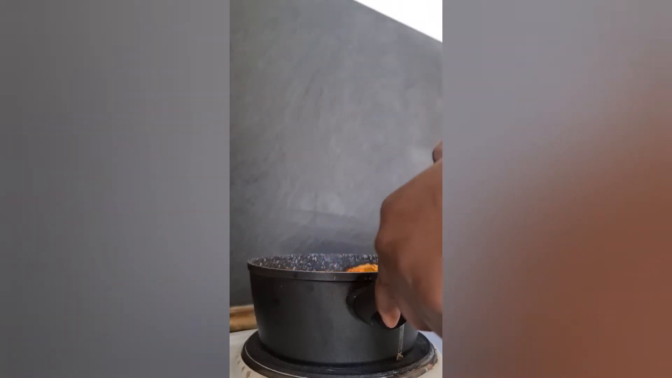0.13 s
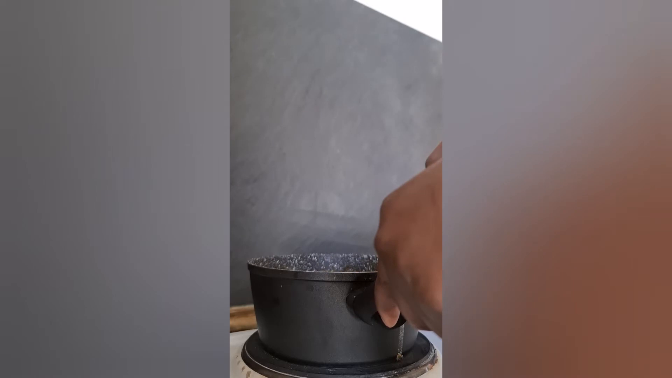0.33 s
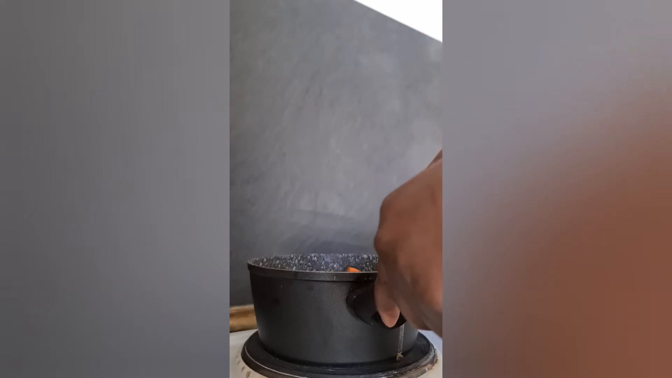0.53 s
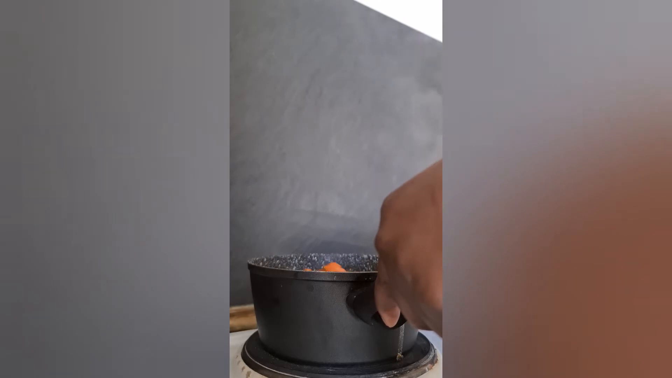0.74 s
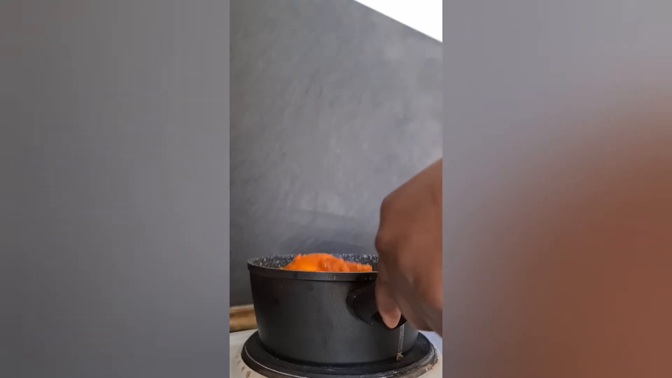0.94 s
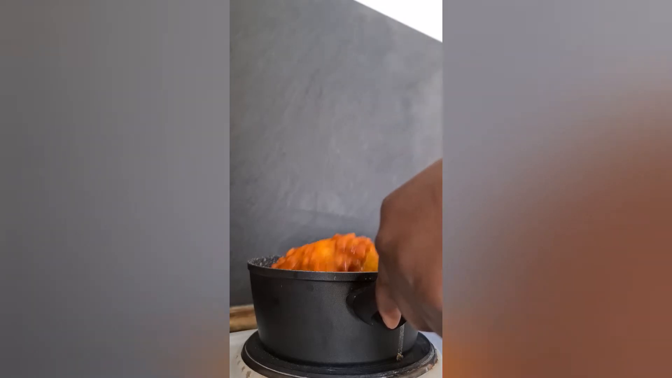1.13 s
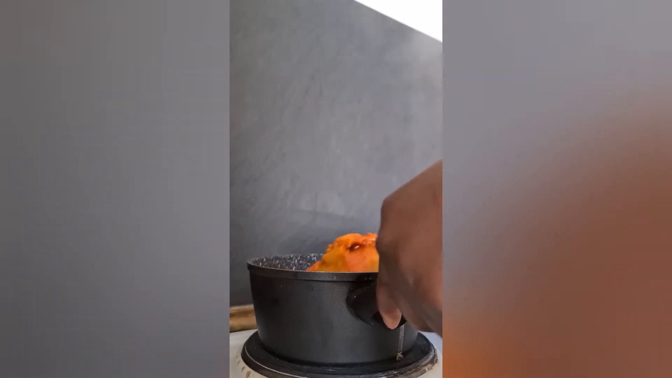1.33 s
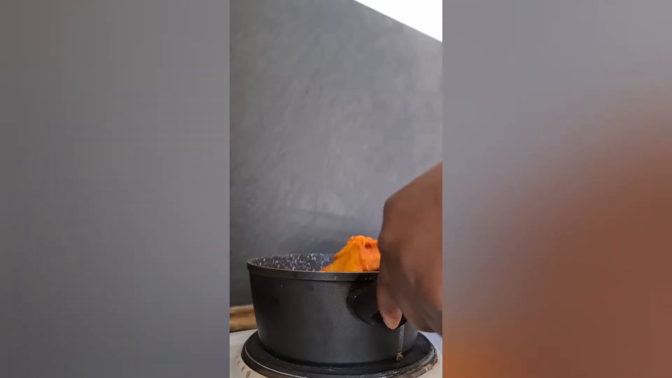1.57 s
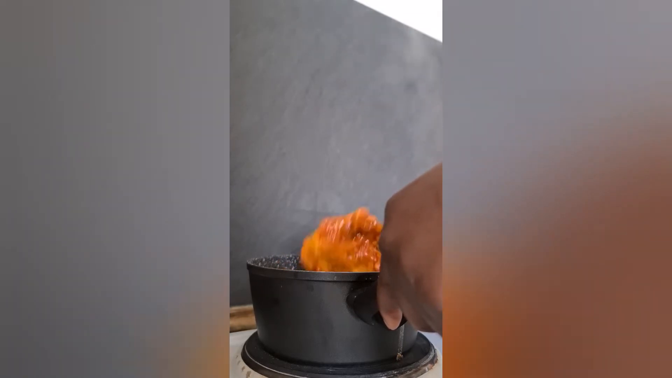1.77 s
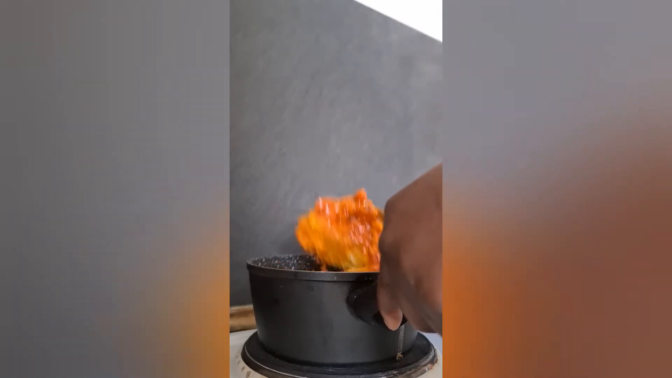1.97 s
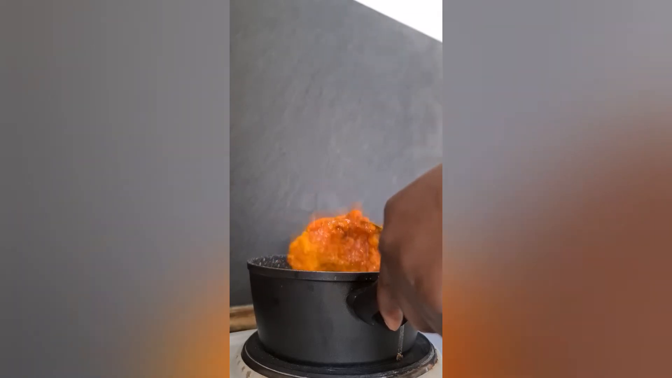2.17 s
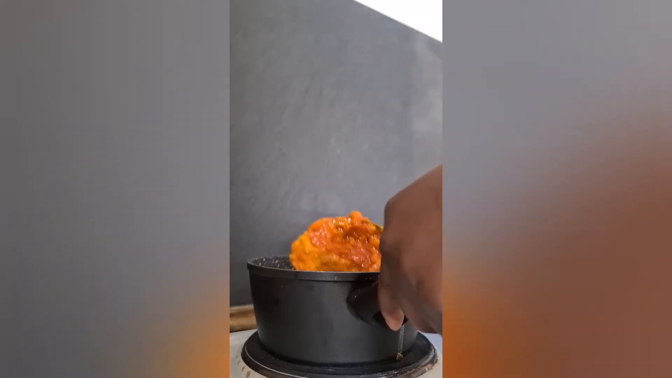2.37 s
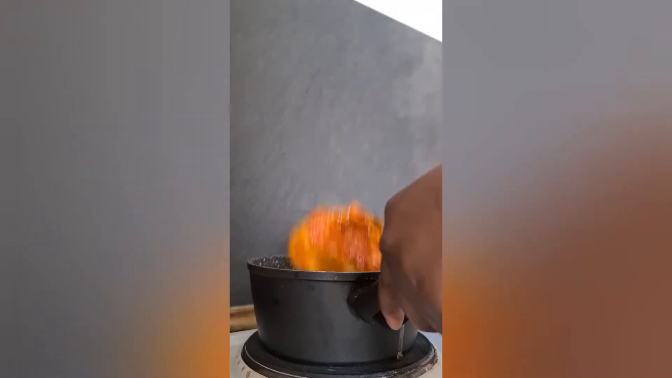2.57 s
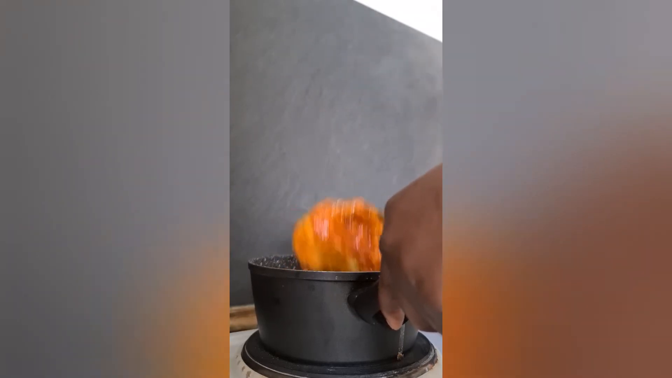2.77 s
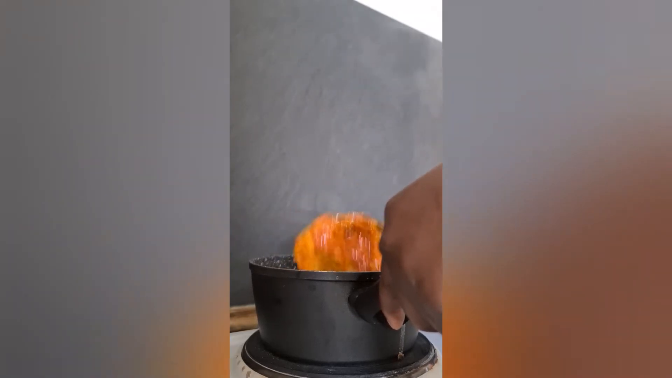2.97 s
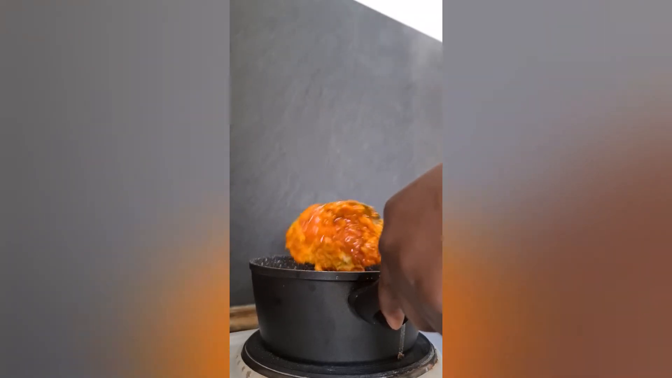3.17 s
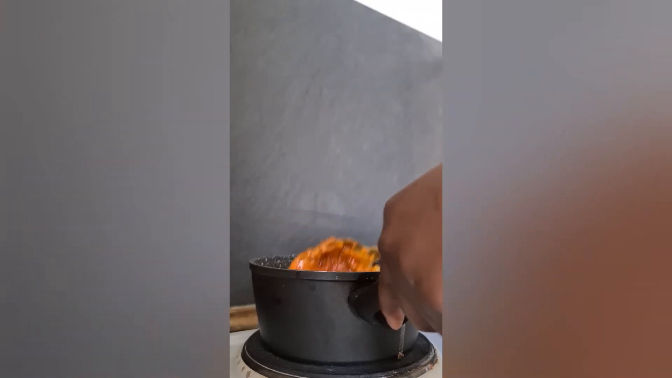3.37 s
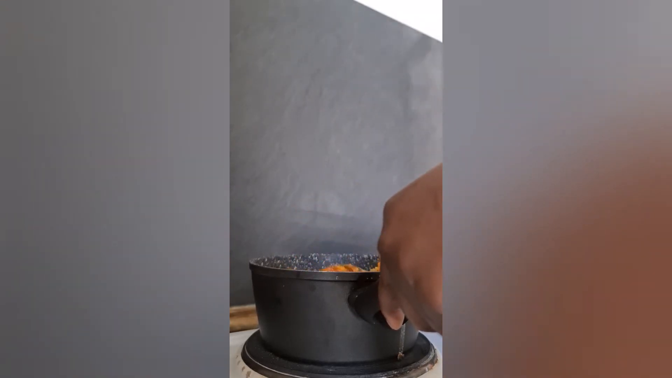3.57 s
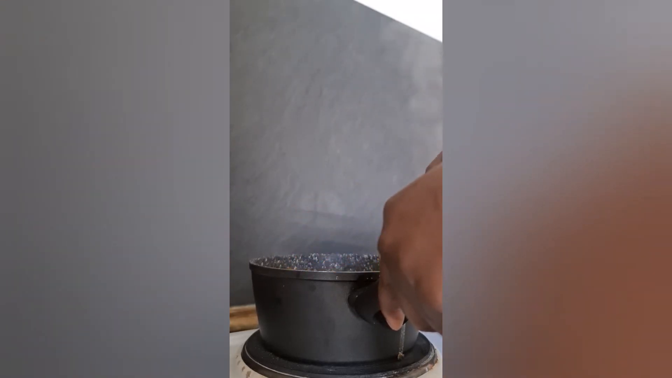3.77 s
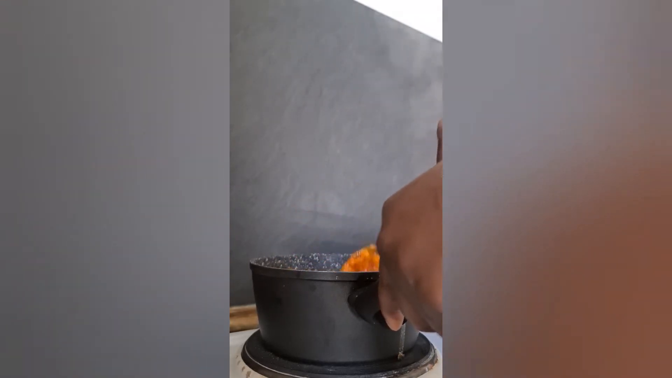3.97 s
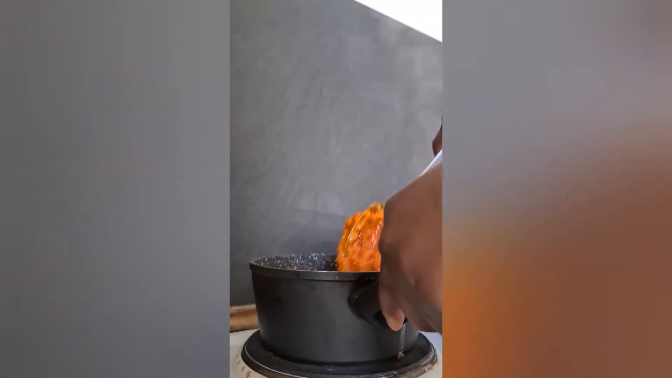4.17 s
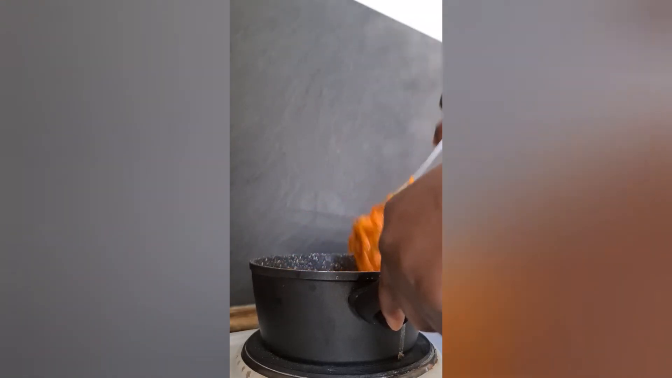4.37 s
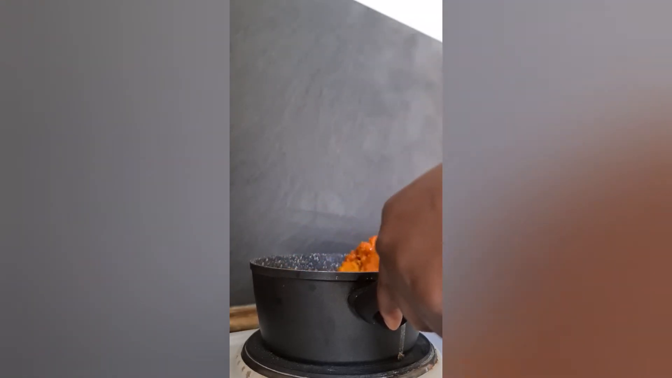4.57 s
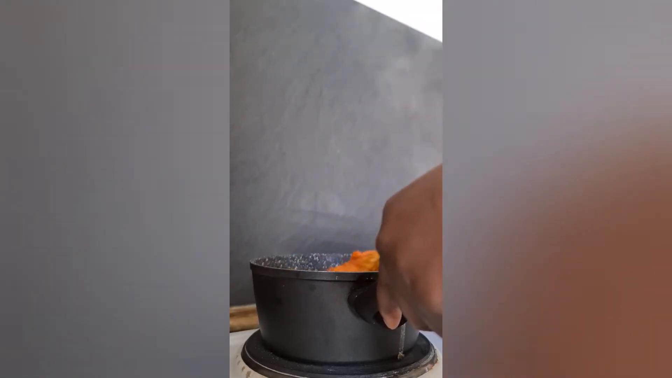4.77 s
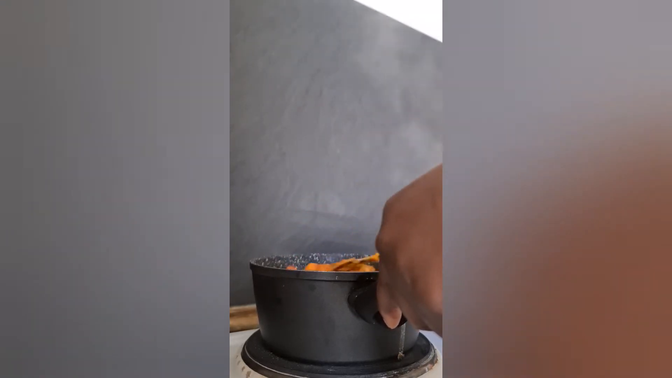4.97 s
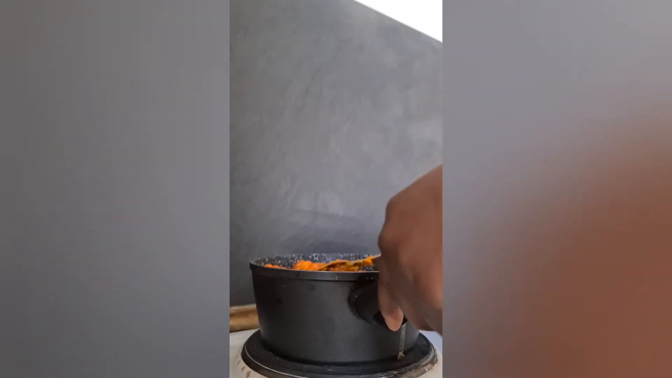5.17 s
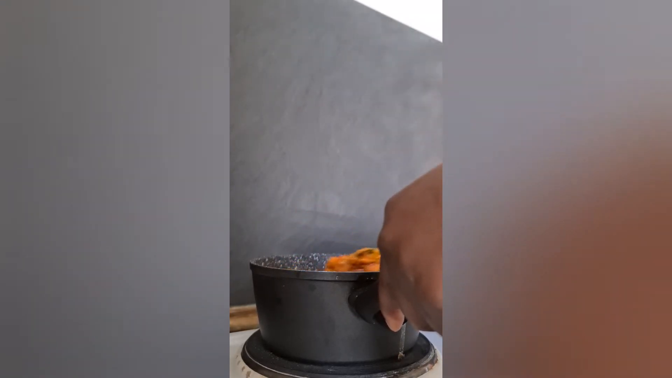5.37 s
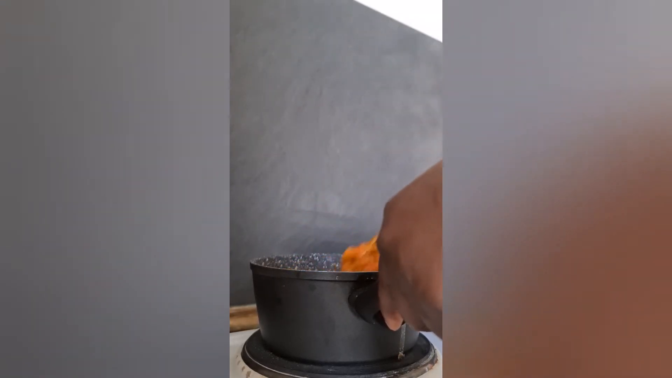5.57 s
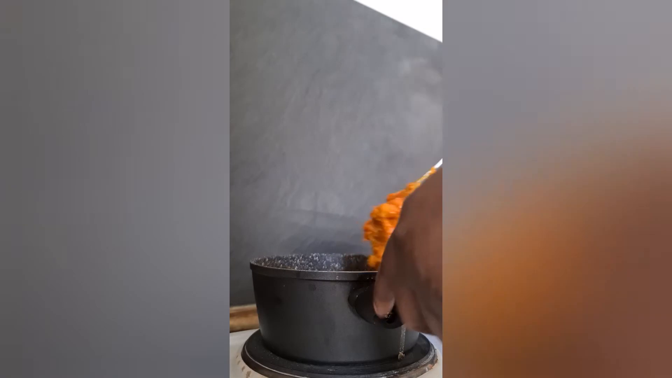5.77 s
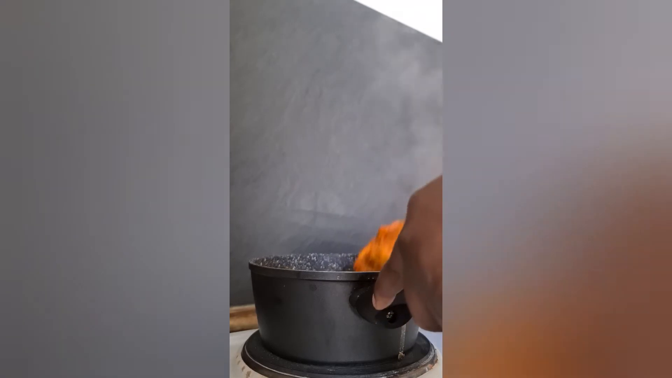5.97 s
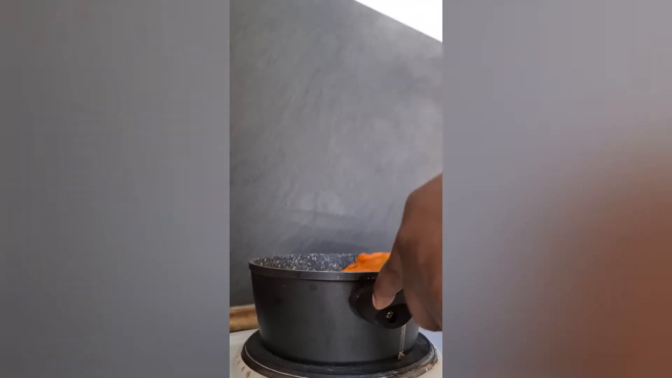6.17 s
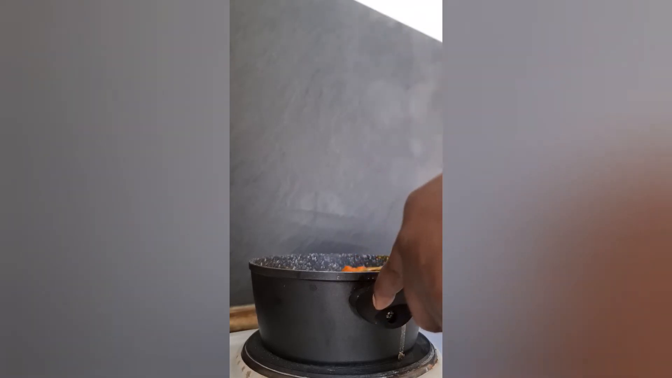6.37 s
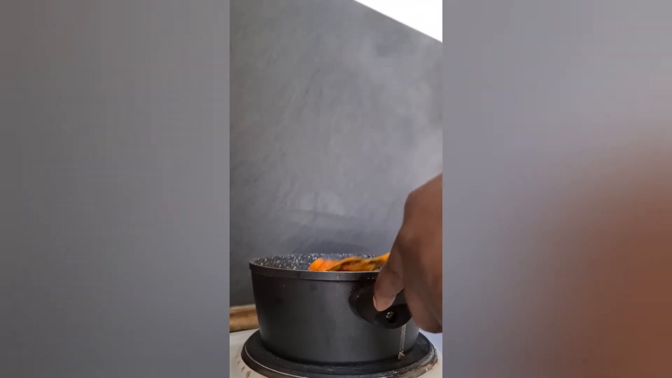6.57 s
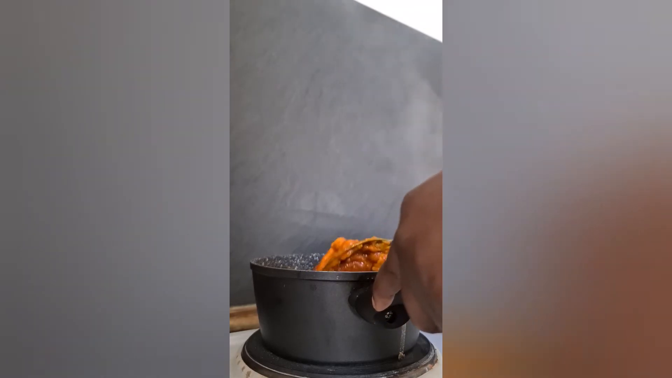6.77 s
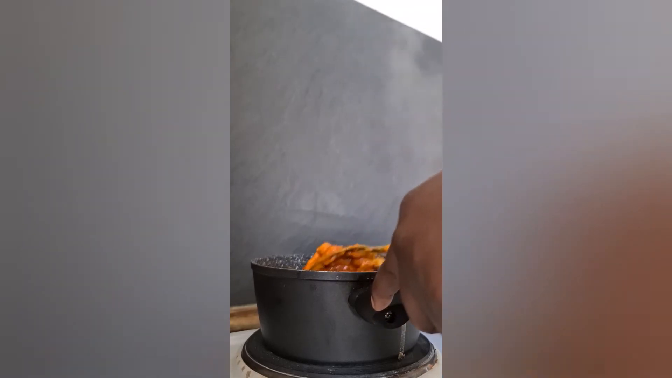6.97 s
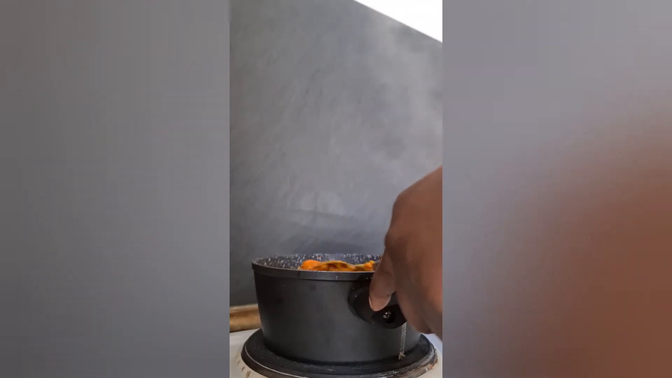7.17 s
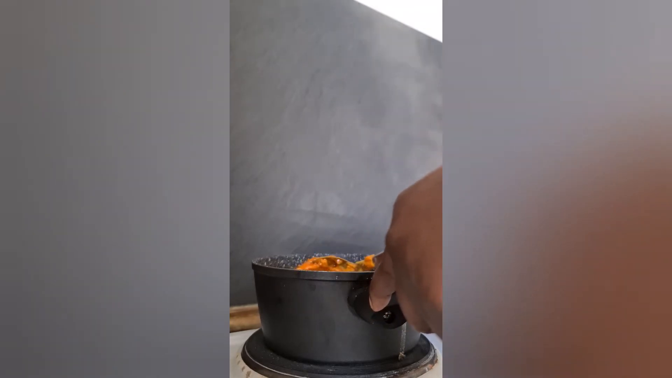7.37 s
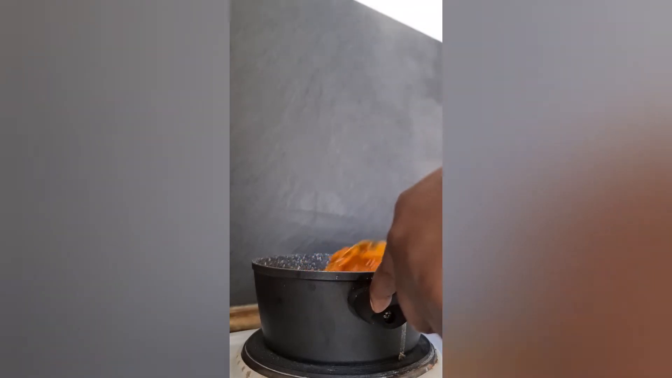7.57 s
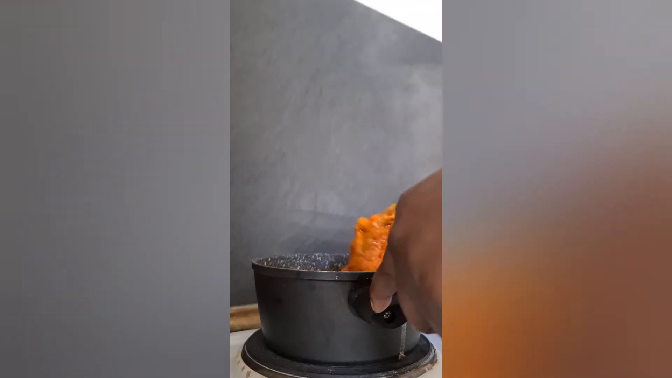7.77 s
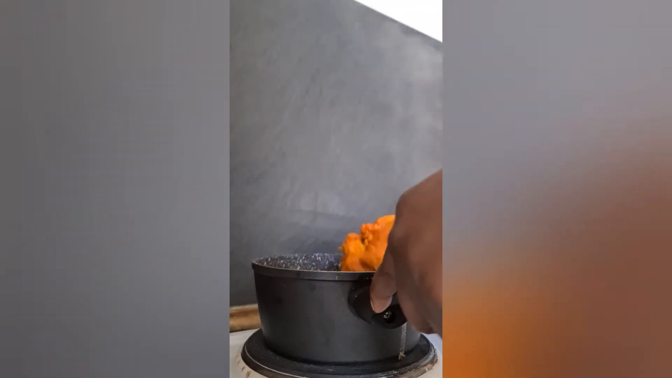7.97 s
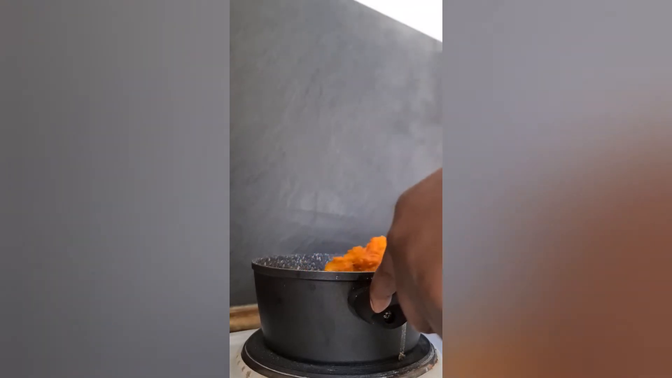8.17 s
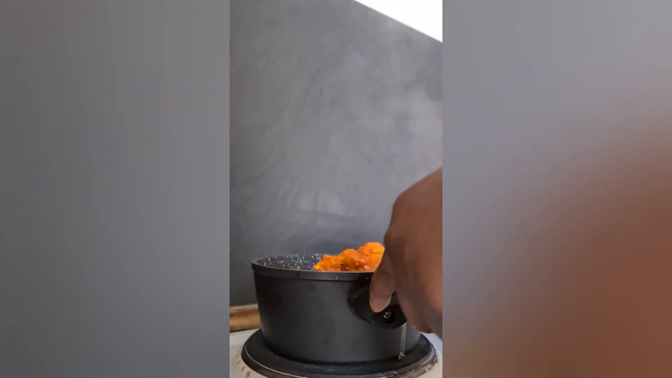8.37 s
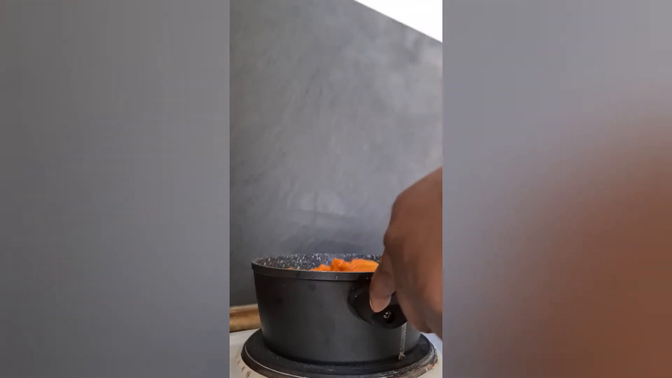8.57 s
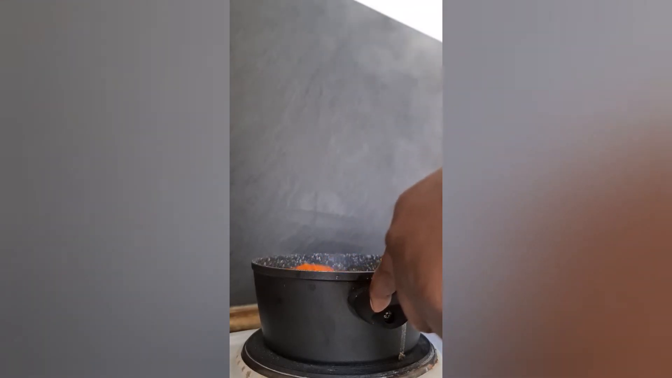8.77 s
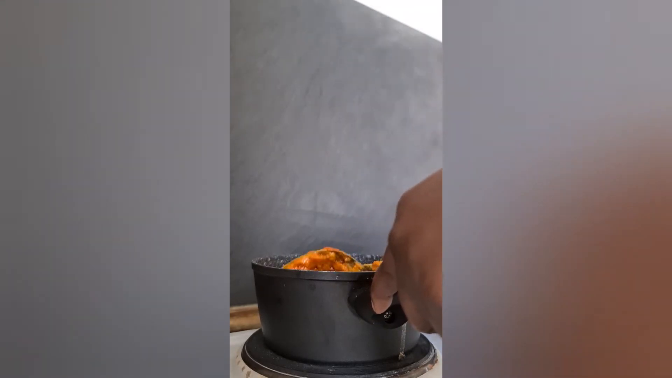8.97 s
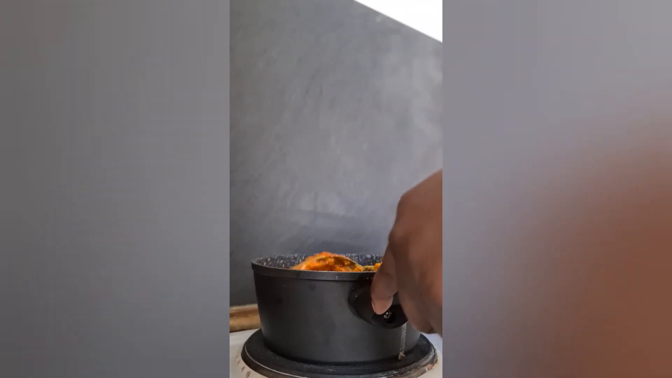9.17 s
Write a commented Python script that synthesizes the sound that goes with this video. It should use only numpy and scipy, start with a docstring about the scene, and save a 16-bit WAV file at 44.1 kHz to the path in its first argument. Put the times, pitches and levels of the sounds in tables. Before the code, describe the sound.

Faint oil sizzle under spoon scrapes, six quick ringing raps on a pot rim, then scattered dull knocks and gritty strokes inside.

```python
"""A faint sizzle of hot oil and a soft scrape come first: a metal spoon turns food in a pot in a small kitchen.
It knocks and scrapes the bottom, is rapped six times on the rim to shake food off, then digs in again.
Blows are short contact pulses with a brief noise burst around the onset, room echoes and decaying low tones;
the rim also rings. Scrapes are four layers of random snaps through the pot's resonances, shaped by the
pressure of the hand. The oil is a steady stream of filtered snaps, with short dying tones for spits and bubbles."""
import sys
import numpy as np
from scipy import signal
from scipy.fft import rfft, irfft, next_fast_len
from scipy.io import wavfile
from scipy.ndimage import uniform_filter1d, map_coordinates

SR = 44100
rng = np.random.default_rng(int(sys.argv[2]) if len(sys.argv) > 2 else 0)


def put_to_file(sound):
    """Save the sound as 16-bit audio at rate SR, in the file named by the first command-line argument."""
    columns = np.atleast_2d(sound).T  # one column per channel
    safe = np.clip(columns, -1, 1)
    whole_steps = np.round(safe * 32767)
    wavfile.write(sys.argv[1], SR, whole_steps.astype(np.int16))


N = 406161  # length in samples

# Spoon on the rim. Each row: start in seconds, level in dB before the mix trims,
# then thud, crack and spoon clang in dB, each heard as its distance from the average rap.
RIM_RAPS = [(2.184, -6, -10, -25.5, -22), (2.366, -7, -7.5, -33, -18.5), (2.533, -6, -10, -28, -21.5),
            (2.712, -4.5, -11.5, -27.5, -23), (2.879, -6, -10, -26, -18.5), (2.999, -11.5, -9.5, -25, -8.5)]
# Colour of a rap's contact. Each row: frequency in Hz, level in dB per Hz before the mix trims.
RAP_CONTACT_COLOUR = [(20, 5), (45, 3), (75, 9), (130, 11), (200, 7.5), (350, 0), (600, -10), (1000, -10),
                      (1450, -4.5), (2000, -14), (3000, -20), (4500, -31), (11000, -40.5), (16000, -51)]
# Ringing of pot, stove and room under a blow on the rim; the low ones also boom under the knocks.
# Each row: frequency in Hz, level in dB relative to the blow, time to fall 60 dB in seconds.
RINGING_MODES = [(47.7, -13.5, 0.7), (65, -11.5, 0.28), (93.5, -26, 0.99), (112, -32, 0.2),
                 (153, -15, 0.33), (205.8, -17, 0.597), (226.3, -15, 0.35), (256.6, -19, 0.49),
                 (313.4, -21, 0.31), (363, -13, 0.18), (401.4, -19.5, 0.23), (479, -20.5, 0.26),
                 (797, -22, 0.17), (1116, -22.5, 0.11), (1300, -19, .09), (1351, -8, 0.097),
                 (1557, -7.5, 0.05), (1620, -24.5, 0.075), (1820, -36.5, 0.16), (2240, -19, 0.071),
                 (3044, -22, 0.047), (4580, -35.5, 0.091), (6860, -24, .03), (10600, -37, .03)]
DETUNE = 0.0081  # the pot shifts on the stove: typical pitch change of a mode, as a share of its frequency


def raps():
    """The spoon hits the same spot of the rim each time, so every rap rings much alike."""
    out = np.zeros((2, N))
    room = kitchen(early_db=5.0, early_t60=0.052, tail_db=-1.5)
    _, _, usual_thud, usual_crack, usual_clang = np.mean(RIM_RAPS, axis=0)
    for s, db, thud_db, crack_db, clang_db in RIM_RAPS:
        contact = blow(RAP_CONTACT_COLOUR, thud_db - usual_thud, crack_db - usual_crack,
                       tone_hz=3280, tone_db=clang_db - usual_clang)
        add(out, s, amp(db + 29.5) * signal.fftconvolve(contact, room, axes=1))
        burst = amp(db + 8.5) * onset_noise(contact, delay=0.00067, fade=0.0023)
        add(out, s - 0.01, burst)
        for k, (hz, level_db, t60) in enumerate(RINGING_MODES):
            add(out, s, amp(db) * rim_ring(k, hz, level_db, t60))
    return out


def rim_ring(k, hz, level_db, t60):
    """One mode of pot, stove or room swells up within a fraction of a cycle or so and dies away."""
    t = np.arange(SR) / SR
    # the deeper the mode, the more alike its phase and its level in both ears
    loose = min(hz / 2000, 1)
    side_db = 3.2 * loose * rng.standard_normal((2, 1))
    gain = amp(level_db + rng.normal(0, 1.45) + side_db - 60 * t / t60)
    phase = k * np.pi + 1.6 * loose * rng.standard_normal((2, 1))
    pitch = hz * (1 + DETUNE * rng.standard_normal())
    swell = 1 - np.exp(-hz * t / 0.082)
    return gain * np.sin(2 * np.pi * pitch * t + phase) * swell


# Spoon against bottom and wall. Each row: start in seconds, level in dB before the mix trims,
# thud and crack in dB (the contact takes their distance from the average knock, the boom the thud itself),
# tone of the struck spot in Hz, its lift in dB.
POT_KNOCKS = [(0.476, -42, -10, -17, 1280, 13), (0.796, -20, -20, -19, 790, -3),
              (0.872, -30.5, -20, -9, 790, 19), (1.852, -21, -4.5, -52, 1120, 9.5),
              (3.479, -9, -11.5, -28, 870, 7.5), (3.861, -38, -31, -18.5, 1920, 18),
              (4.536, -0.5, -14, -22.5, 780, 2.5), (4.774, -22.5, -23, -42, 497, 16.5),
              (6.0, -35.5, -10.5, -22, 495, 16), (6.076, -6, -12.5, -31, 614, 13),
              (7.112, -10.5, -11, -34.5, 1720, 7.5), (7.25, -20, -21, -23, 802, 9),
              (7.324, -28, -27, -8, 780, 13), (8.122, -2.5, -16.5, -19.5, 854, 1.5),
              (8.78, -18.5, -12, -7.5, 834, 2)]
# Colour of a knock's contact. Each row: frequency in Hz, level in dB per Hz before the mix trims.
KNOCK_CONTACT_COLOUR = [(20, -50), (48, 6.5), (80, 0.5), (130, 8), (240, 7.5), (380, -1.5), (600, -2),
                        (850, 1), (1350, -4), (2000, -7), (3000, -11.5), (5000, -22.5), (8000, -25.5),
                        (16000, -50)]


def knocks():
    """Food damps the blows inside the pot; only the low boom of stove and room rings on."""
    out = np.zeros((2, N))
    _, _, usual_thud, usual_crack, _, _ = np.mean(POT_KNOCKS, axis=0)
    boom = low_boom()
    for s, db, thud_db, crack_db, tone_hz, tone_db in POT_KNOCKS:
        contact = blow(KNOCK_CONTACT_COLOUR, thud_db - usual_thud, crack_db - usual_crack, tone_hz, tone_db)
        room = kitchen(early_db=5.5, early_t60=0.035, tail_db=-4.5)
        add(out, s, amp(db + 19) * signal.fftconvolve(contact, room, axes=1))
        burst = amp(db - 5.5) * onset_noise(contact, delay=0.00054, fade=0.0021)
        add(out, s - 0.01, burst)
        add(out, s, amp(db + thud_db - 11.5) * boom)
    return out


def low_boom():
    """The modes of stove and room below 330 Hz, dying away together."""
    t = np.arange(SR) / SR
    boom = np.zeros(SR)
    for k, (hz, level_db, t60) in enumerate(RINGING_MODES):
        if hz < 330:
            boom += (-1) ** k * amp(level_db - 60 * t / t60) * np.sin(2 * np.pi * hz * t)
    return boom


def blow(colour, thud_db, crack_db, tone_hz, tone_db):
    """One contact: its weight sets the bass, its hardness the treble, the struck spot a broad tone."""
    tilt = [(260, thud_db), (520, 0), (2000, 0), (4200, crack_db)]

    def colour_db(hz):
        return along(colour, hz) + along(tilt, hz) + tone_db * bell(hz, tone_hz, 0.5 * tone_hz)
    return pulse(colour_db)[None]


def onset_noise(contact, delay, fade):
    """A short burst of noise in the blow's colour swells just before the hit and fades; starts 10 ms ahead."""
    t = np.arange(SR // 50) / SR - 0.01 - delay  # seconds from the top of the swell
    swell = np.exp(-np.abs(t) / np.where(t < 0, 0.0038, fade))
    noise = rng.standard_normal((2, len(t))) * swell
    coloured = signal.fftconvolve(noise, contact, axes=1)
    return filtered(coloured, lambda hz: hz ** 4 / (hz ** 4 + 650 ** 4))  # thins out the bass


# Strokes of the spoon. Each row: start in seconds, length in seconds, rub in dB halfway before the mix trim,
# swell from start to end in dB, then judder, drag and grit in dB relative to the rub before their own trims.
SPOON_STROKES = [(0.0, 0.39, -55.5, 10.5, 15.5, -0.5, -14), (0.484, 0.43, -49, 5, 8.5, 3, -12),
                 (0.776, 0.13, -42, 4.5, 7, 2.5, -1), (0.926, 0.018, -53.5, -7, 0, 13.5, -8),
                 (1.35, 0.065, -57, -1, 13, 4, -15), (1.738, 0.029, -55.5, -2, 6, -4, -5),
                 (3.554, 0.25, -56.5, -17.5, 12, 0, -11), (3.897, .025, -51.5, -8, 0.5, 0.5, -13),
                 (4.443, 0.084, -59, 2, -3, 3, -4), (4.6, 0.16, -48.5, 7.5, 5.5, 3, -9.5),
                 (4.755, 0.32, -42, 1.5, -3, -5.5, -14), (5.24, 0.065, -48, -2, -9, 0.5, -11.5),
                 (5.334, 0.09, -40.5, 6.5, -4, -1.5, -10.5), (6.122, 0.3, -41, -2.5, -6, 2, -11),
                 (6.588, 0.015, -57.5, -8, 2, 2, -10), (7.209, 0.13, -36, 0.5, -0.5, -1, -10),
                 (7.353, 0.16, -43, 5.5, -0.5, -0.5, -11.5), (7.56, .045, -59.5, 5, 11, 5, -12),
                 (8.163, 0.1, -44.5, 1, 3.5, -4, -13.5), (8.325, .15, -47, 10, 3.5, -0.5, -10.5),
                 (8.506, 0.25, -43, 9, -1.5, -1, -7), (8.782, .1, -42, -5.5, 6, 2.5, -1),
                 (9.034, .17, -64, -9, 13, 2, -10)]
# Colours of the four kinds of friction: the pot shaking, food dragging, spoon rubbing, metal grating.
# Each row: frequency in Hz, relative level in dB per Hz before the pot's resonances.
JUDDER_COLOUR = [(20, -1), (48, -4), (85, -2), (140, 4.5), (220, 1), (330, -7), (600, -23), (1500, -92)]
DRAG_COLOUR = [(150, -56), (330, 0), (450, 0), (650, -4.5), (830, 2), (1050, -9), (1600, -42.5)]
RUB_COLOUR = [(600, -43), (1000, -2), (1300, 0.5), (1650, -2.5), (2200, -6.5), (2900, -10.5), (4500, -47)]
GRIT_COLOUR = [(1200, -16), (2300, -7), (3200, 2), (4800, -1.5), (7000, -6), (10000, -11.5), (14500, -18.5),
               (16000, -27)]
JUDDER_GROWS, DRAG_GROWS, GRIT_GROWS = 0.61, 0.92, 1.03  # dB per dB of rub: grit needs pressure most
UNEVEN_DB, UNEVEN_PER_S = 0.83, 24  # unsteadiness of the hand: depth, random knots a second
CATCH_DB, CATCH_PER_S = 0.5, 70  # the spoon catches and lets go: depth, random knots a second


def scrapes():
    """Each stroke shakes the pot, drags through the food, rubs the bottom and grates where metal meets metal."""
    power = np.zeros((4, N))
    for start, length, db, swell_db, judder_db, drag_db, grit_db in SPOON_STROKES:
        press_db = pressure(start, length, swell_db)
        touching = press_db > -60
        p = press_db[touching]
        layers_db = [judder_db + JUDDER_GROWS * p, drag_db + DRAG_GROWS * p, p, grit_db + GRIT_GROWS * p]
        power[:, touching] += amp(db + np.array(layers_db)) ** 2
    hand_db = UNEVEN_DB * wobble(UNEVEN_PER_S) + CATCH_DB * wobble(CATCH_PER_S)
    judder, drag, rub, grit = np.sqrt(power) * amp(hand_db)
    out = amp(-2.5) * judder * friction(JUDDER_COLOUR, rate=1000, patch_db=1.5)
    out += amp(1.5) * drag * friction(DRAG_COLOUR, rate=2000, patch_db=2.5)
    out += amp(1.6) * rub * friction(RUB_COLOUR, rate=6000, patch_db=5.0)
    out += amp(2.0) * grit * friction(GRIT_COLOUR, rate=12000, patch_db=5.5)
    return out


ATTACK_DB_PER_S, RELEASE_DB_PER_S = 502, 286  # how fast the spoon bites and lifts off
ARCH_DB = 2.5  # the hand presses hardest in mid-stroke


def pressure(start, length, swell_db):
    """Course of one stroke in dB: the spoon bites, presses on in a rising or falling arch, and lifts off."""
    t = np.arange(N) / SR - start
    way = np.clip(t / length, 0, 1) - 0.5
    held = swell_db * way - ARCH_DB * (2 * way) ** 2
    return held - ATTACK_DB_PER_S * np.maximum(-t, 0) - RELEASE_DB_PER_S * np.maximum(t - length, 0)


def friction(colour, rate, patch_db):
    """Small slips of the spoon sound through the pot, patchy as the contact point wanders over the metal."""
    slips = spread(patchy(grains(rate), patch_db))
    return unit(filtered(slips, lambda hz: amp(along(colour, hz) + pot_db(hz))))


# Resonances of the pot with food in it. Each row: frequency in Hz, width in Hz,
# lift in dB (in full for friction, in part for the sizzle).
POT_RESONANCES = [(220, 48, 3), (563, 19, 9), (817, 135, 4.5), (1284, 130, 6.5), (1936, 210, 5.5),
                  (3000, 220, 0.5), (3610, 260, 2.5), (3750, 170, 6), (5990, 280, 11), (6700, 300, 7),
                  (7900, 300, 3), (9360, 830, 3.5), (10960, 1200, 7)]


def pot_db(hz):
    """The lift that the pot's resonances give each frequency."""
    return sum(db * bell(hz, centre, width) for centre, width, db in POT_RESONANCES)


# Clear oil spits and wet smacks of the food.
# Each row: start in seconds, level in dB before the room answers, pitch in Hz.
OIL_SPITS = [(0.51, -38, 3000), (1.06, -41.5, 3530), (1.529, -44, 2040), (4.076, -47, 795),
             (4.364, -44, 2100), (5.522, -35, 1820), (6.75, -42, 3960), (6.911, -35.5, 3580),
             (7.983, -36.5, 3600), (9.003, -40.5, 2080), (9.037, -35, 3120)]
BUBBLE_DB, BUBBLE_RANGE_DB = -60.5, 13  # the quietest bubbles, and how much louder the loudest may be


def spits(count=600):
    """A few clear spits among many small bubbles bursting in the oil."""
    out = np.zeros(N)
    for s, db, hz in OIL_SPITS:
        add(out, s, amp(db) * bubble(hz, cycles=3.5))
    for when, size, pitch in rng.random((count, 3)):
        level_db = BUBBLE_DB + BUBBLE_RANGE_DB * size ** 3  # mostly quiet ones
        add(out, when * N / SR, amp(level_db) * bubble(1500 * 4 ** pitch, cycles=2.5))
    room = kitchen(early_db=1, early_t60=0.04, tail_db=-9)
    return signal.fftconvolve(out[None], room, axes=1)[:, :N]


def bubble(hz, cycles):
    """A bursting bubble: a few dying cycles."""
    t = np.arange(SR // 40) / SR
    return np.sin(2 * np.pi * hz * t) * np.exp(-hz * t / cycles)


# Colour of frying oil and room tone. Each row: frequency in Hz, relative level in dB per Hz
# before the pot's resonances.
SIMMER_COLOUR = [(15, -47), (25, -5.5), (55, -4.5), (148, -8), (248, -9), (486, -15), (557, -20.5),
                 (654, -24), (749, -13.5), (1060, -20.5), (2150, -21.5), (2890, -27), (3780, -22.5),
                 (5230, -30), (15800, -37.5)]
# Rise and fall of the simmer, which sinks while the food is lifted out of the oil.
# Each row: time in seconds, gain in dB.
SIMMER_COURSE = [(0, 2), (3.5, -1.5), (4.15, -3), (4.7, 1), (6.8, .5), (7.85, 1), (8.6, -1)]
SIMMER_DB = -53.5  # rms before the room tone trim and the course
ROOM_TONE_DB = -1.5  # trim of the low room tone


def simmer():
    """Fine steady sizzle of the oil, made of tiny snaps, over the low tone of the room."""
    fizz = spread(patchy(grains(rate=6000), depth_db=4.0))
    coloured = filtered(fizz, lambda hz: amp(along(SIMMER_COLOUR, hz) + 0.3 * pot_db(hz)))
    whole = amp(SIMMER_DB) * unit(coloured)
    room_tone = filtered(whole, lambda hz: 1 / (1 + (hz / 450) ** 4))
    sizzle = whole - room_tone
    course_db = np.interp(np.arange(N) / SR, *np.transpose(SIMMER_COURSE))
    return (room_tone * amp(ROOM_TONE_DB) + sizzle) * amp(course_db)


# Decay of the kitchen's tail. Each row: frequency in Hz, time to fall 60 dB in seconds.
KITCHEN_DECAY = [(50, 0.65), (130, 0.16), (300, 0.44), (750, 0.27), (2000, 0.19), (5000, 0.2),
                 (14000, 0.16)]


def kitchen(early_db, early_t60, tail_db):
    """Direct sound, a quick cloud of echoes from pot and wall, then the room's tail."""
    hz, t, z = signal.stft(rng.standard_normal((2, SR * 3 // 4)), SR, nperseg=256)
    decay = amp(-60 * t / along(KITCHEN_DECAY, hz)[:, None])
    tail = signal.istft(z * decay, SR, nperseg=256)[1]
    t = np.arange(tail.shape[1]) / SR
    early = rng.standard_normal(tail.shape) * amp(-60 * t / early_t60)
    early = filtered(early, lambda hz: hz ** 2 / (hz ** 2 + 300 ** 2))  # small surfaces do not return the bass
    tail = tail * (1 - np.exp(-t / 0.0045))
    answer = spread(amp(early_db) * unit(early) + amp(tail_db) * unit(tail)) / np.sqrt(len(t))
    answer[0, 0] += 1
    answer[1, 3] += 1  # the direct sound reaches the left microphone a little sooner
    return answer


# Stereo width. Each row: frequency in Hz, likeness of left and right (1 the same, 0 unrelated).
LEFT_RIGHT_LIKENESS = [(60, 1), (130, 0.9), (250, 0.8), (600, 0.44), (1300, 0.37), (2500, 0), (6000, 0)]


def spread(pair):
    """Two unrelated signals become a diffuse field: one in the bass, two in the treble."""
    def shares(hz):
        turn = np.arccos(np.clip(along(LEFT_RIGHT_LIKENESS, hz), -1, 1)) / 2
        return np.array([np.cos(turn), np.sin(turn)])
    mid, side = filtered(pair, shares)
    return np.array([mid + side, mid - side])


def placed(pair, lean):
    """Shares each frequency between left and right."""
    return filtered(pair, lambda hz: amp(np.array([[0.5], [-0.5]]) * along(lean, hz)))


def grains(rate):
    """Stereo stream of tiny snaps of random size, about rate a second, rms 1."""
    return unit((rng.random(N) < rate / SR) * rng.standard_normal((2, N)))


def patchy(x, depth_db):
    """Short-lived patches of gain over time and frequency, the same in both channels."""
    z = signal.stft(x, nperseg=1024)[2]
    field = uniform_filter1d(rng.standard_normal(z.shape[1:]), size=3, axis=0)  # across frequency
    field = uniform_filter1d(field, size=10, axis=1)  # across time
    return signal.istft(z * amp(depth_db * unit(field)), nperseg=1024)[1][:, :N]


def pulse(colour_db, size=8192):
    """The sharpest causal pulse with the given spectrum."""
    cepstrum = irfft(np.log(amp(colour_db(np.fft.rfftfreq(size, 1 / SR)))))
    cepstrum[1:size // 2] *= 2
    cepstrum[size // 2 + 1:] = 0
    return irfft(np.exp(rfft(cepstrum)))


def bell(hz, centre, width):
    """Shape of one resonance, 1 at its centre."""
    return 1 / (1 + (2 * (hz - centre) / width) ** 2)


def wobble(rate):
    """A smooth random curve, rate knots a second."""
    return map_coordinates(rng.standard_normal(int(N * rate / SR) + 4), [np.arange(N) * rate / SR])


def filtered(x, response):
    """x times a response of frequency."""
    m = next_fast_len(x.shape[-1] + SR // 4)
    return irfft(rfft(x, m) * response(np.fft.rfftfreq(m, 1 / SR)), m)[..., :x.shape[-1]]


def along(points, hz):
    """(Hz, value) points read on a log axis."""
    f, v = np.transpose(points)
    return np.interp(np.log(hz + 1), np.log(f + 1), v)


def add(track, s, sound):
    """Mixes a sound into the track from time s on."""
    part = track[..., max(round(s * SR), 0):][..., :sound.shape[-1]]
    part += sound[..., :part.shape[-1]]


def amp(db):
    """Decibels to gain."""
    return 10 ** (np.asarray(db) / 20)


def unit(x):
    """Scaled to rms 1."""
    return x / np.sqrt(np.mean(x ** 2) + 1e-20)


# Stereo lean of blows on the rim, and of sounds inside the pot.
# Each row: frequency in Hz, left minus right in dB.
RIM_BALANCE = [(60, -0.5), (110, -0.5), (200, -1.5), (380, -4), (700, -8.5), (1290, -6.5), (2380, -4),
               (4400, -1), (8120, 1), (15000, -1)]
POT_BALANCE = [(60, 1.5), (110, -6), (200, -3), (380, -4.5), (700, -7), (1290, -9), (2380, -5),
               (4400, -2.5), (8120, 2.5), (15000, -1.5)]


def scene():
    """Spoon and oil; the middle range of the pot reaches the right side more strongly."""
    inside_pot = knocks() + scrapes() + simmer() + spits()
    return placed(raps(), RIM_BALANCE) + placed(inside_pot, POT_BALANCE)


TOP_HZ = 15750  # band limit of the microphone


def record(dry):
    """The microphone drops the deepest bass, rounds off the loudest peaks and keeps nothing above its band limit."""
    highpass = signal.butter(N=3, Wn=34, btype="highpass", fs=SR, output="sos")
    thinned = signal.sosfilt(highpass, dry)
    rounded = thinned / (1 + np.abs(thinned / 1.02) ** 6) ** (1 / 6)
    return filtered(rounded, lambda hz: hz < TOP_HZ)


dry = scene()
out = record(dry)
put_to_file(out)
```